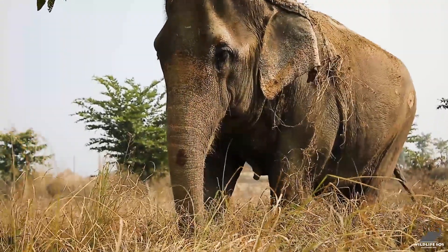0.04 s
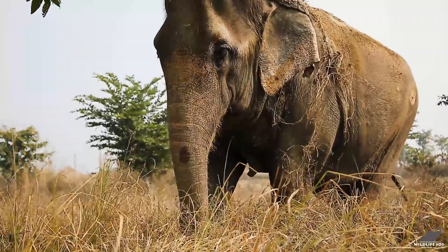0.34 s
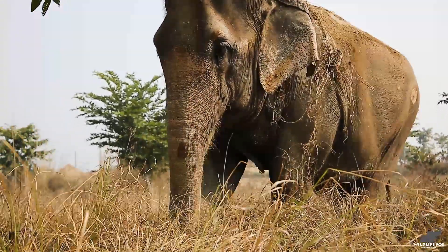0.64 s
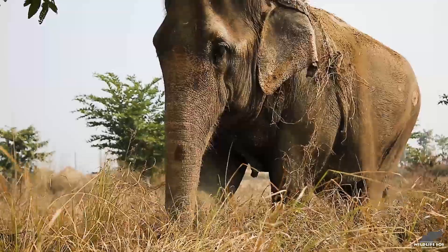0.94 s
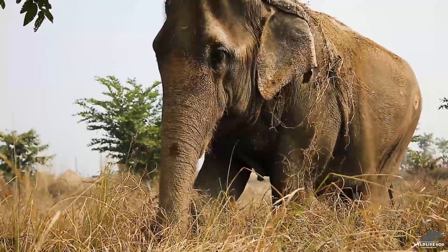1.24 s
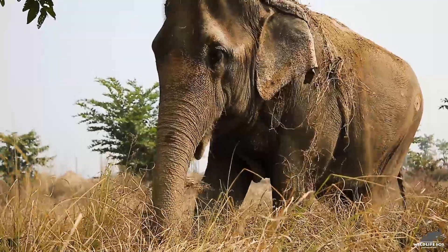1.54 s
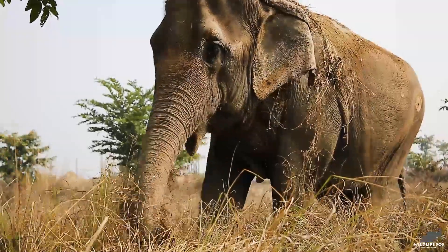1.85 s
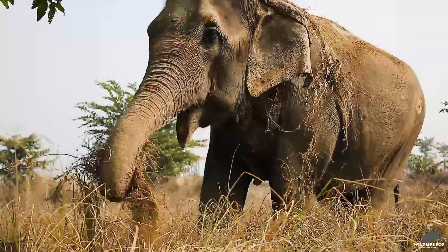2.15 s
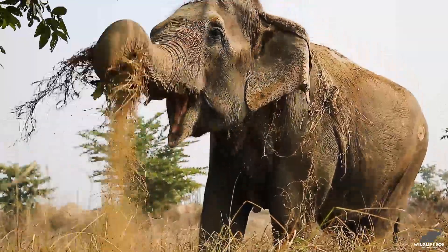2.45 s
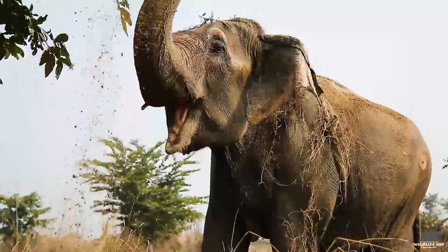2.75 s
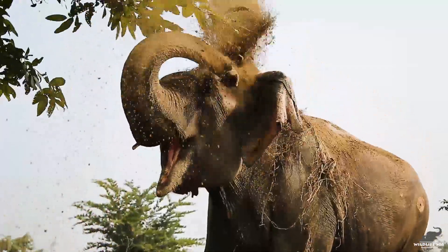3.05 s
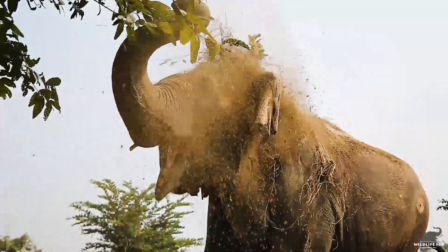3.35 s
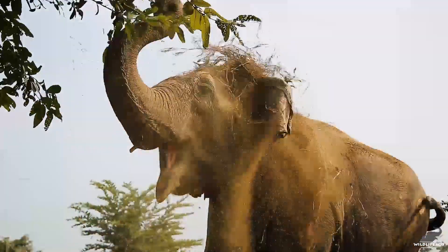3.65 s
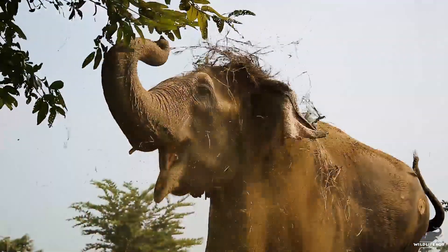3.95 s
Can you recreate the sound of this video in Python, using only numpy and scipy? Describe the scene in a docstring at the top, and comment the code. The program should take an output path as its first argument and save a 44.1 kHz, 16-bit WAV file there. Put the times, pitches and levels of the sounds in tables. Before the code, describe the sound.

A gritty blast of air from an elephant's trunk, between rustling grass and falling dirt.

```python
"""An elephant blows a trunkful of dirt over its head, after scraping up soil and grass in a dry field.
The blast starts with a thin whistle in the nostril, rings the trunk like a tube and ends in spurts.
Dirt patters down on its back, among low thumps that are probably its ears flapping against the hide.
Light wind rumbles underneath; the sound is mono."""
import sys
import numpy as np
from scipy.fft import rfft, irfft, next_fast_len
from scipy.io import wavfile
from scipy.ndimage import map_coordinates

SR = 44100
rng = np.random.default_rng(int(sys.argv[2]) if len(sys.argv) > 2 else 0)


def persist_wave(psi):
    """Save psi, clipped to +-1, as 16-bit WAV."""
    counts = np.round(np.clip(psi, -1, 1) * 32767).astype(np.int16)
    wavfile.write(sys.argv[1], SR, np.atleast_2d(counts).T)


N = 176400  # 4 seconds


def amp(db):
    """Turn decibels into a number to multiply by."""
    return 10 ** (np.asarray(db) / 20)


def unit(x):
    """Scale a signal to an average strength (rms) of 1."""
    return x / np.sqrt(np.mean(x ** 2) + 1e-20)


def level(rows, fade_db_per_s=1500):
    """A volume curve through (t/s, level/dB) points that fades quickly outside them."""
    s, db = np.transpose(rows)
    t = np.arange(N) / SR
    outside_s = np.maximum(0, np.maximum(s[0] - t, t - s[-1]))
    return amp(np.interp(t, s, db) - fade_db_per_s * outside_s)


def wobble(rate):
    """A smooth curve through `rate` random values a second."""
    return map_coordinates(rng.standard_normal(8192), [np.arange(N) * rate / SR], mode="wrap")


def filtered(x, response):
    """Multiply each frequency f in x by response(f)."""
    size = next_fast_len(len(x) + SR // 4)
    f = np.fft.rfftfreq(size, 1 / SR) + 1e-3
    return irfft(rfft(x, size) * response(f), size)[:len(x)]


def coloured(x, points):
    """Shape the tone of x with (f/Hz, level/dB) points and scale it to strength 1."""
    hz, db = np.transpose(points)
    return unit(filtered(x, lambda f: amp(np.interp(np.log(f), np.log(hz + 1), db))))


def resonance(f, hz, width):
    """The response of something that rings near one frequency, hz."""
    return 1j * f * width / (hz * hz - f * f + 1j * f * width)


def noise():
    """An even hiss (white noise)."""
    return rng.standard_normal(N)


def crackle(per_s, spread_db, ticks_db):
    """Hiss with tiny ticks of random time, size and pitch on it."""
    t = np.arange(96) / SR
    start, size, pitch, chance = rng.random((12000, 4)).T[..., None]
    hz = 2200 * 6 ** pitch
    sounding = chance < per_s * N / SR / len(chance)
    gain = amp(spread_db * np.minimum(-np.log(size), 3)) * sounding
    ticks = gain * np.sqrt(hz) * np.sin(2 * np.pi * hz * t) * np.exp(-hz * t / 0.56)
    index = (start * N).astype(int) + np.arange(len(t))
    track = np.bincount(index.ravel(), ticks.ravel(), N)[:N]  # add each tick at its own time
    return noise() + amp(ticks_db) * unit(track)


def chuff(s, length, start_hz, end_hz, width):
    """A rounded puff of noise whose pitch can slide; it spreads about width * start_hz to each side."""
    progress = np.clip((np.arange(N) / SR - s) / length, 0, 1)
    phase = 2 * np.pi * np.cumsum(start_hz + (end_hz - start_hz) * progress) / SR
    a, b = (filtered(noise(), lambda f: 1 / (1 + (f / (width * start_hz)) ** 2)) for _ in range(2))
    swell = 2 * np.sqrt(progress * (1 - progress))
    return unit(a * np.sin(phase) + b * np.cos(phase)) * swell


def wind():
    """Lumpy gusts buffet over the rumble of far wind and a steady hiss of air."""
    # strength of the gusts: t/s, level/dB
    gust_levels = [(0, -59), (.35, -63), (.55, -54), (.75, -56.5), (.95, -59.5), (1.15, -72), (1.6, -65),
                   (2.15, -68), (2.3, -54), (2.5, -57.5), (2.63, -48), (2.8, -61.5), (3.05, -55),
                   (3.25, -62.5), (3.36, -51.5), (3.66, -48.5), (3.8, -63), (4, -65)]
    # tone of the gusts, the far wind and the air over the field: f/Hz, level/dB
    gust_colour = [(15, -17), (30, -3), (55, -0.5), (85, -3), (130, -10.5), (250, -23), (600, -58)]
    rumble_colour = [(30, -18), (60, -4.5), (120, 0), (190, -1.5), (260, -6.5), (380, -12), (600, -28.5),
                     (1200, -55)]
    air_colour = [(240, -38), (400, -8.5), (673, -12.5), (1000, -9.5), (1400, -12), (2400, -12),
                  (3400, -15), (6000, -11), (11000, -15), (15500, -18)]
    gusts = coloured(noise(), gust_colour) * level(gust_levels) * amp(1.1 * wobble(13))
    rumble = amp(-58) * coloured(noise(), rumble_colour)
    air = amp(-57.5) * coloured(noise(), air_colour)
    return gusts + rumble + air


def scuffs():
    """Hide, soil and grass rub softly together."""
    # rubs: t/s, length/s, level/dB, f/Hz, width as a share of f
    rubs = [(0.049, 0.11, -62, 1795, 0.41), (0.076, 0.24, -68, 1030, 0.044), (1.13, 0.56, -70, 1195, 0.05),
            (1.697, 0.11, -59.5, 1885, 0.33), (1.977, 0.076, -58, 1694, 0.5),
            (2.254, 0.067, -54, 955, 0.54), (2.732, 0.0155, -46, 383, .35)]
    return sum(amp(db) * chuff(s, length, hz, hz, width) for s, length, db, hz, width in rubs)


def grass():
    """Dry stalks crackle as the trunk drags them."""
    # loudness of the dragging: t/s, level/dB
    levels = [(0, -64.5), (.25, -64), (.46, -74), (.50, -59), (.68, -55.5), (1.0, -55), (1.2, -54.5),
              (1.38, -55), (1.65, -53), (1.76, -50.5), (1.95, -50.5), (2.22, -50.5), (2.28, -47),
              (2.38, -49), (2.42, -51.5), (2.62, -48), (2.9, -61)]
    # tone of the stalks: f/Hz, level/dB
    colour = [(290, -23), (500, -5), (982, -5), (1220, -1.5), (1410, -5.5), (3010, -2.5), (3740, -2.5),
              (9510, -1.5), (15500, -8)]
    stalks = coloured(crackle(per_s=500, spread_db=4.5, ticks_db=-10), colour)
    return stalks * level(levels) * amp(1.45 * wobble(24.89))


def soil():
    """Fine soil hisses as it sifts out of the trunk's grip."""
    # loudness of the trickle: t/s, level/dB
    levels = [(1.6, -78), (1.85, -52.5), (2.18, -48), (2.37, -45.5), (2.43, -54), (2.55, -52), (2.66, -72),
              (2.8, -77)]
    # tone of the trickle: f/Hz, level/dB
    colour = [(1000, -25), (3500, -12), (6000, 1), (9000, 0.5), (14000, 4), (16000, -1)]
    grains = coloured(crackle(per_s=2200, spread_db=1, ticks_db=-7), colour)
    return grains * level(levels) * amp(0.55 * wobble(29.8))


def flaps():
    """Soft low pushes of air, probably from the ears hitting the hide."""
    # thumps: t/s, peak level/dB, f/Hz, half length/s
    thumps = [(2.671, -34, 68, 0.01), (2.670, -31.5, 168, 0.0047), (3.438, -33.5, 85, 0.021),
              (3.440, -28, 239, 0.0028), (3.525, -32.5, 67, 0.02), (3.604, -30, 75, .013),
              (3.600, -40, 260, 0.0027), (3.633, -34.5, 123, 0.009), (3.694, -40.5, 130, 0.0065)]
    t, out = np.arange(N) / SR, np.zeros(N)
    for s, db, hz, half_length in thumps:
        swell = np.exp(-np.abs((t - s) / half_length) ** 1.7)
        out += amp(db) * np.cos(2 * np.pi * hz * (t - s)) * swell
    return out


def shower():
    """Sand and crumbs patter on the elephant's back."""
    # loudness of the falling dirt: t/s, level/dB
    levels = [(3.0, -59), (3.14, -44.5), (3.3, -46), (3.43, -45), (3.6, -43.5), (3.74, -45), (3.9, -46.5),
              (4.05, -49)]
    # tone of the patter: f/Hz, level/dB
    colour = [(240, -28), (400, -6), (928, -5), (1150, -1), (1510, -3.5), (3110, -1.5), (5650, 0),
              (11100, -1), (15500, -6.5)]
    patter = coloured(crackle(per_s=1300, spread_db=3.5, ticks_db=-6.5), colour)
    return patter * level(levels) * amp(0.97 * wobble(30.07))


def snaps(tick_s=0.0065):
    """Stalks snap and clods land: each is a sharp tick with a short crumble after it."""
    # hits: t/s, peak level/dB, f/Hz, crumble compared with tick/dB, time for crumble to fade 60 dB/s
    hits = [(.949, -40, 2400, -11, .04), (.970, -42, 2800, -19, .03), (1.0, -37, 3000, -11, .05),
            (1.018, -40, 5000, -18, .02), (1.324, -39, 7200, -16, .02), (2.388, -39, 2590, -14, .03),
            (2.543, -29.5, 3900, -12, 0.11), (2.712, -30, 4000, -5, 0.026),
            (3.179, -28.5, 1470, -20, 0.035), (3.208, -31, 6700, -16, .02), (3.54, -33.5, 2500, -14, 0.037),
            (3.704, -32, 3080, -20, .04), (3.747, -37, 4600, -4, .06), (3.815, -22.5, 4500, -7, .06),
            (3.819, -30, 5000, -6.5, 0.074), (3.961, -34.5, 3400, 7, 0.12), (3.973, -34, 2600, -8, 0.046)]
    t, out = np.arange(SR // 8) / SR, np.zeros(N + SR)
    for s, db, hz, crumble_db, crumble_s in hits:
        tick = rng.standard_normal(len(t)) * amp(-60 * t / tick_s)
        crumble = rng.standard_normal(len(t)) * amp(crumble_db - 60 * t / crumble_s)
        ring = filtered(tick + crumble, lambda f: resonance(f, hz, width=0.4 * hz))
        out[round(s * SR):][:len(t)] += amp(db) * ring / np.abs(ring).max()
    return out[:N]


def spurts():
    """Short sliding puffs as the last lumps leave the trunk."""
    # puffs of air and dirt: t/s, length/s, level/dB, start f/Hz, end f/Hz, width as a share of start f
    puffs = [(2.985, .024, -36, 3600, 5380, 0.19), (2.996, 0.015, -41.5, 1000, 855, 0.33),
             (3.002, 0.027, -39, 3100, 1890, 0.13), (3.063, 0.0096, -41, 2100, 2030, 0.071),
             (3.105, 0.024, -36, 3110, 3310, 0.21)]
    return sum(amp(db) * chuff(s, length, start, end, width) for s, length, db, start, end, width in puffs)


def whistle():
    """A thin, unsteady squeal as the air first forces its way out of the nostril."""
    # path of the squeal: t/s, f/Hz, level/dB
    path = [(2.615, 578, -52), (2.63, 643, -50), (2.645, 672, -45.5), (2.668, 657, -48),
            (2.692, 675, -45.5), (2.72, 648, -46), (2.75, 636.6, -48.5), (2.775, 634, -51),
            (2.794, 536, -45), (2.81, 518, -65)]
    # tones that make up the squeal: multiple of the pitch, relative level/dB
    harmonics = [(1, -20), (2, -3.5), (3, 3), (4, -17)]
    s, hz, db = np.transpose(path)
    pitch = np.interp(np.arange(N) / SR, s, hz) * (1 + 0.0222 * wobble(600))
    phase = 2 * np.pi * np.cumsum(pitch) / SR
    tone = sum(amp(tone_db) * np.sin(multiple * phase) for multiple, tone_db in harmonics)
    return unit(tone) * level(np.c_[s, db]) * amp(1.2 * wobble(140))


def blast():
    """Gritty air rushes out of the trunk, whose tube rings more and more as it clears."""
    # force of the blast: t/s, level/dB
    levels = [(2.66, -52), (2.68, -41.5), (2.74, -39.5), (2.78, -37), (2.89, -38), (2.95, -36),
              (3.0, -33.5), (3.04, -37.5), (3.12, -38.5), (3.15, -65)]
    # tone of the rushing air: f/Hz, level/dB
    colour = [(120, -50), (200, -19), (358, -3.5), (515, -10.5), (769, -2), (842, -10), (957, -4),
              (1560, -4), (2330, -5.5), (4840, -3), (15500, -8)]
    # pitches at which the trunk rings: f/Hz, width/Hz, relative level/dB
    rings = [(964, 105, -1), (1078, 71, 0.5), (1327, 59, 5), (2003, 130, 5), (2330, 100, 2.5),
             (2700, 100, 1), (2990, 80, -8), (3660, 60, -12), (4770, 230, 0)]
    grit = crackle(per_s=1200, spread_db=4.5, ticks_db=-5.5)
    jet = coloured(grit, colour) * amp(1.3 * wobble(70))
    tube = filtered(noise(), lambda f: sum(amp(db) * resonance(f, hz, w) ** 2 for hz, w, db in rings))
    clearing_db = 25 * np.clip(np.arange(N) / SR - 2.98, -.5, .2)  # rises 25 dB a second
    hollow = unit(tube) * amp(-11.5 + clearing_db + 2.7 * wobble(70))
    return level(levels) * (jet + hollow)


def scene():
    """Add up all the sounds, the same for left and right."""
    mix = wind() + scuffs() + grass() + soil()
    mix += blast() + whistle() + spurts()
    mix += shower() + snaps() + flaps()
    return np.array([mix, mix])


def record(dry, top_hz=15800):
    """Cut away the very highest treble."""
    return np.array([filtered(x, lambda f: f < top_hz) for x in dry])


dry = scene()
out = record(dry)
persist_wave(out)
```